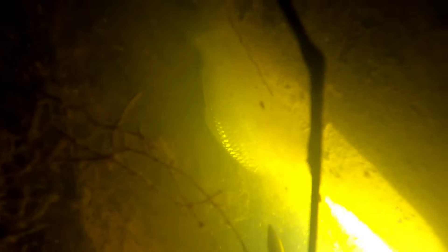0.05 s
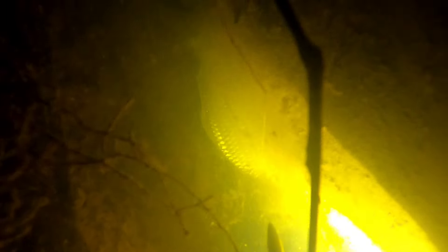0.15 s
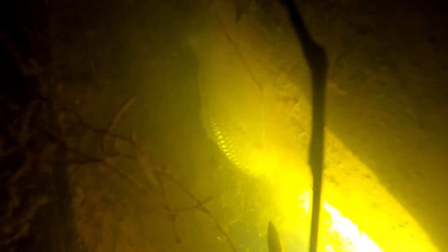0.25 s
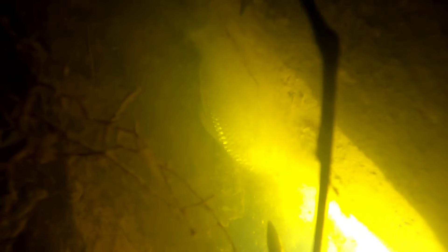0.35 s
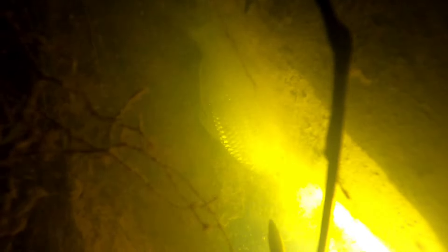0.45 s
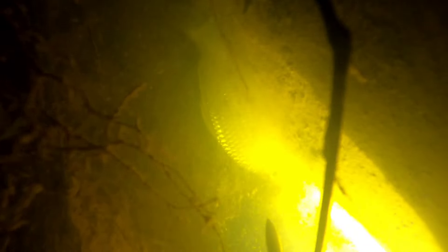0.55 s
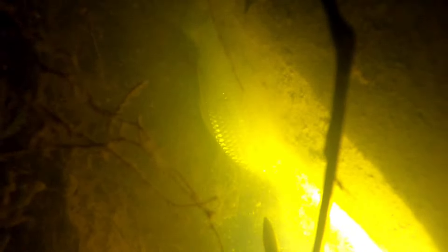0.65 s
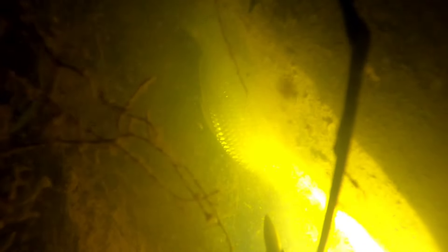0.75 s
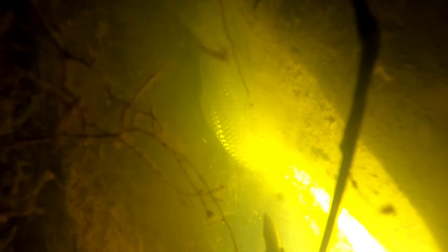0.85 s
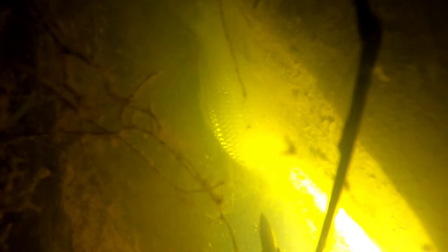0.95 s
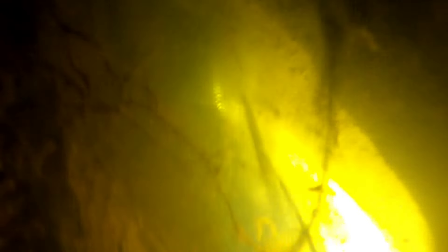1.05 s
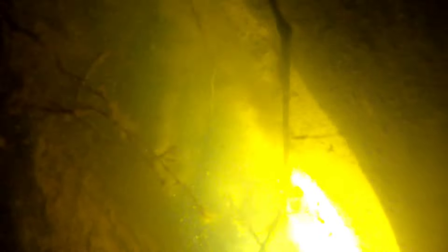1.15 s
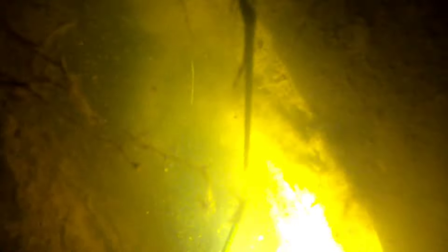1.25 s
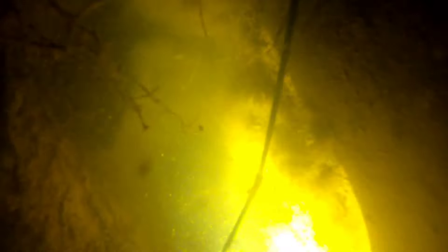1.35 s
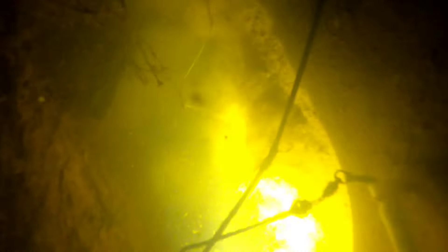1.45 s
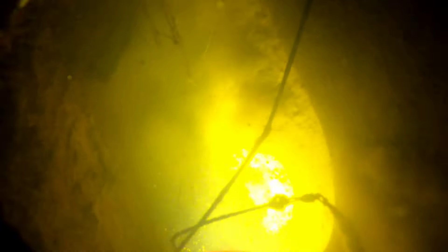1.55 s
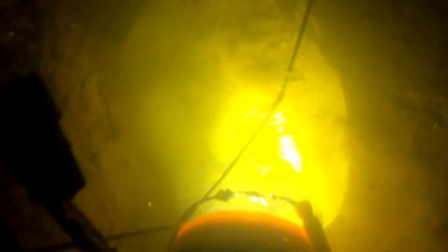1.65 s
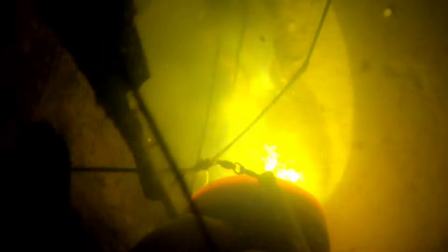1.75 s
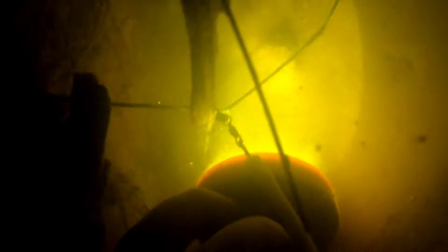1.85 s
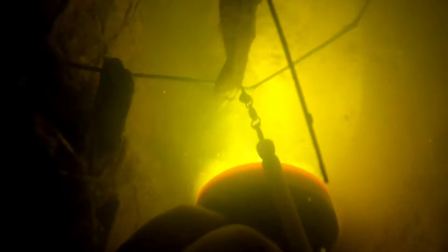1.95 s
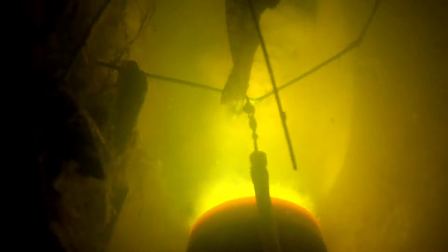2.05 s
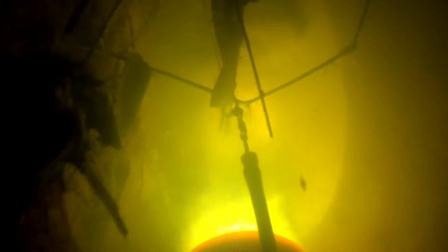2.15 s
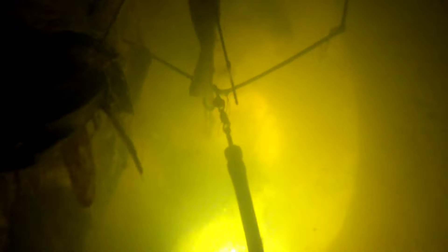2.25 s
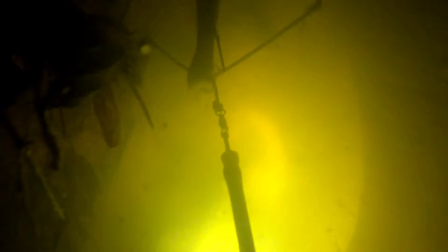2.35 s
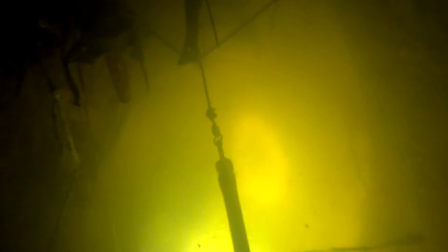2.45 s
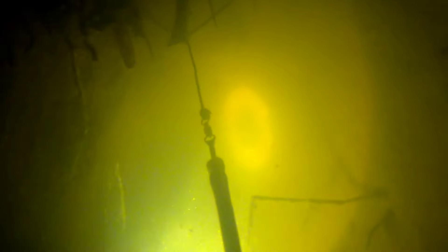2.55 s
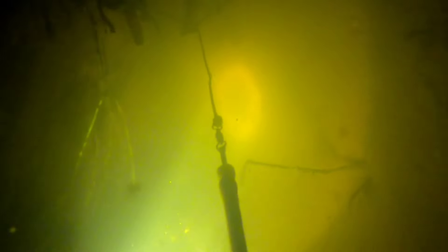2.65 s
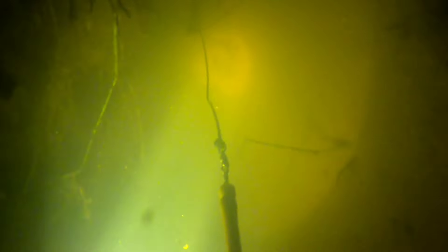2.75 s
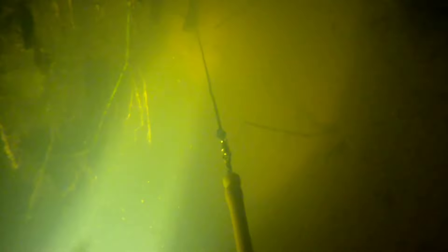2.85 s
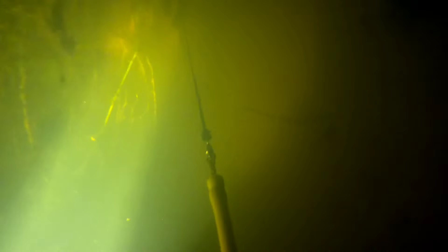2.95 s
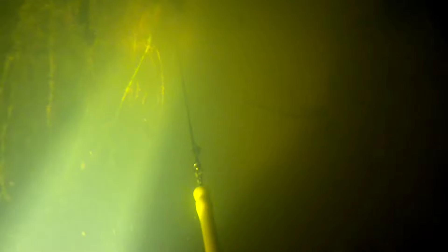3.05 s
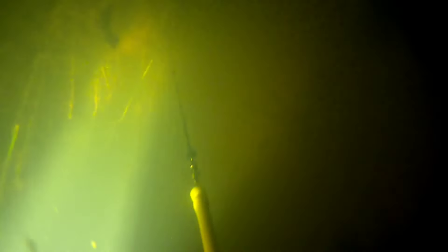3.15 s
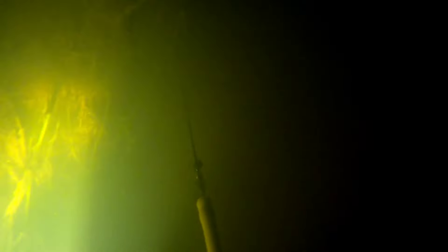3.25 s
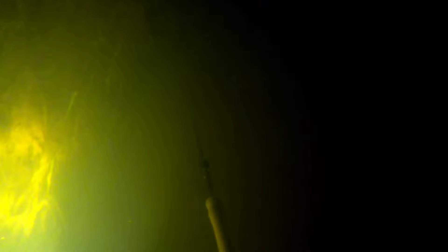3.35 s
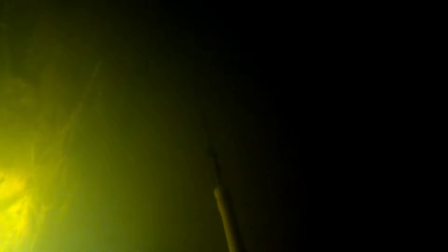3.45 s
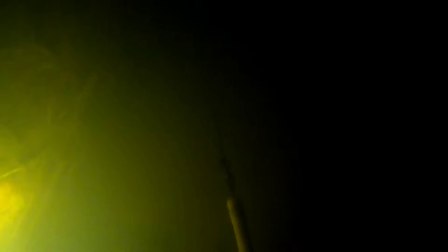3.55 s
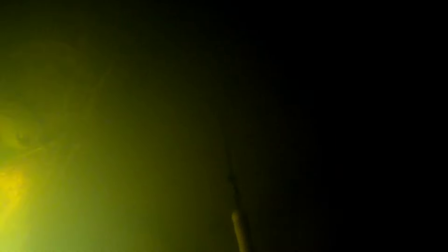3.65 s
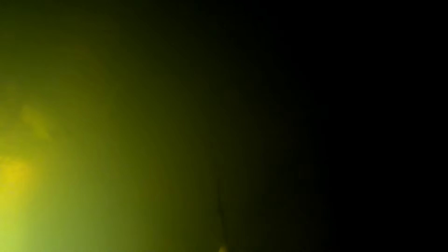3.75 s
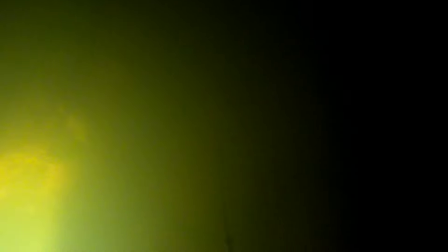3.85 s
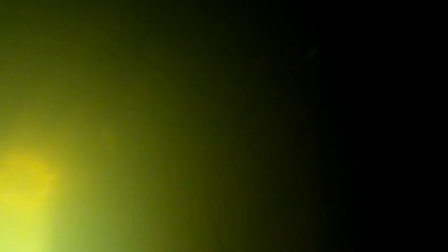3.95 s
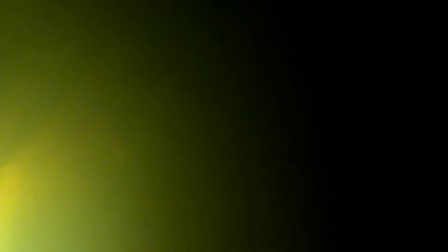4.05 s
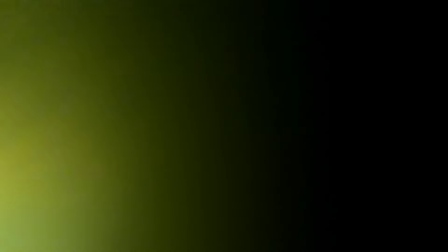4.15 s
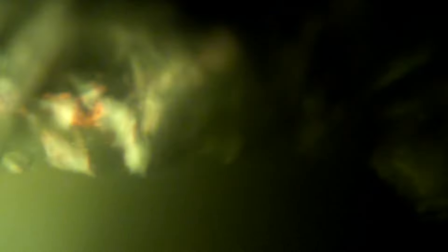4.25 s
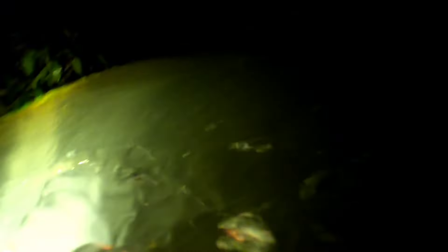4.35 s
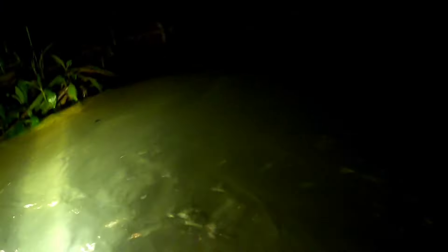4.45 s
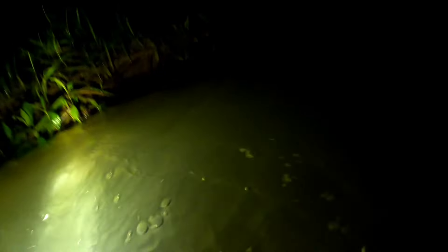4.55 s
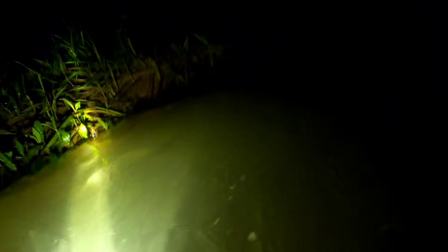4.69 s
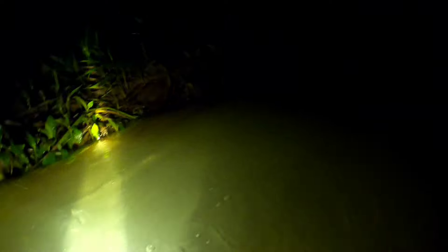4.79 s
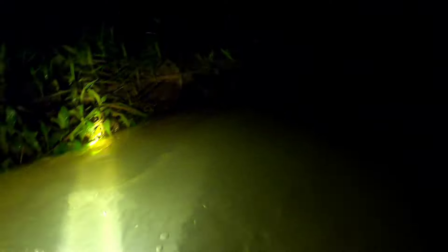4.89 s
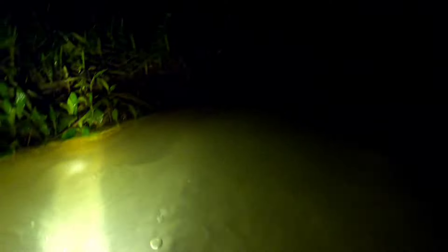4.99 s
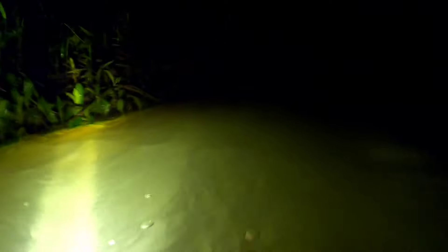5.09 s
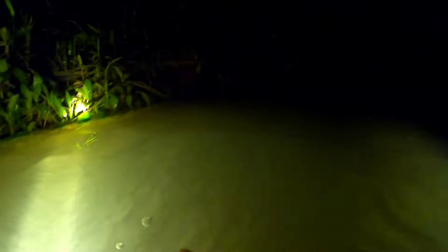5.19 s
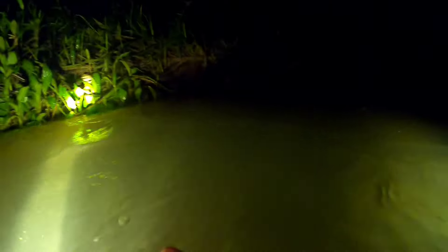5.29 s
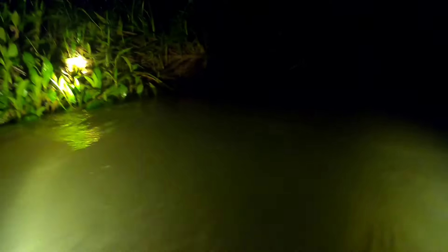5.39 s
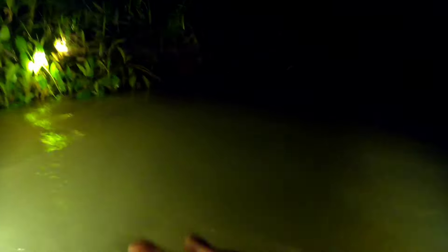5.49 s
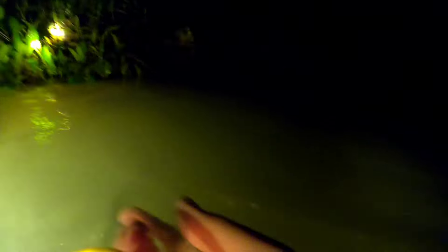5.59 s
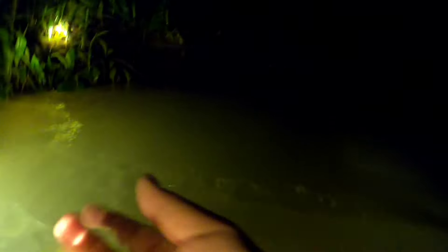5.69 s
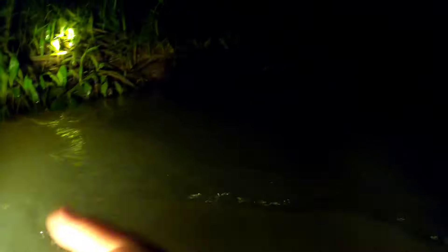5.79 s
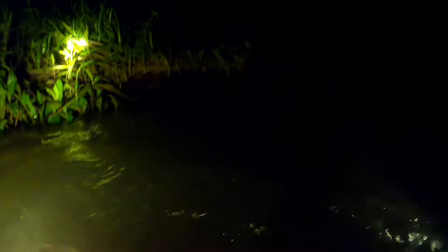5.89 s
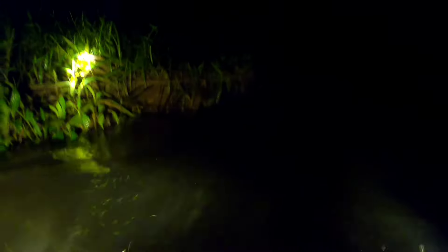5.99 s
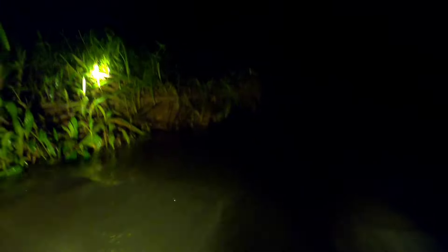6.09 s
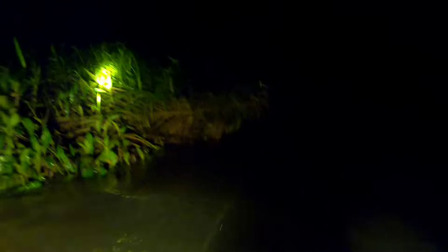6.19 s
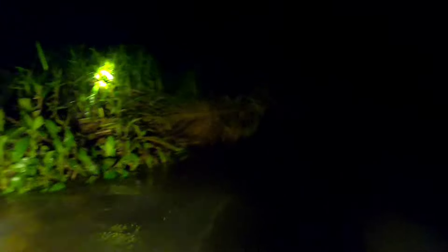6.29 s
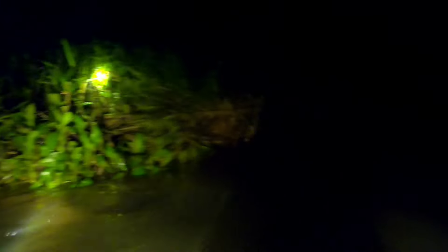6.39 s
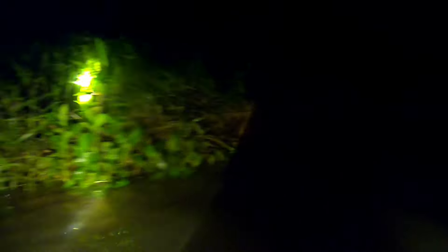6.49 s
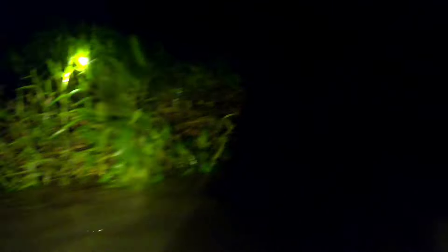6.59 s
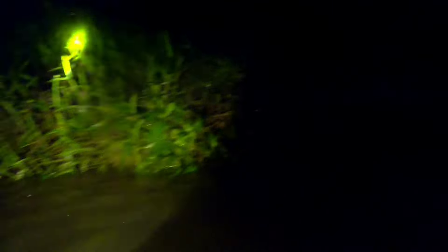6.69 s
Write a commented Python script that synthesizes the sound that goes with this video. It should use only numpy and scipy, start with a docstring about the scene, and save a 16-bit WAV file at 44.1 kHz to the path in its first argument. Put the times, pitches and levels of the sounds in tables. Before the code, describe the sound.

The sound is close and enclosed, inside a waterproof housing in a river, almost centred. From 0 to 1.3 seconds there is only dull, wavering water rumble, soft hiss and a few low bumps as the diver aims. At 1.3 a speargun fires: an abrupt, very loud cluster of hard clacks, short metallic and hollow ringing, and a deep thump swinging for a few cycles, all gone in about a tenth of a second. A burst of high fizz flares on the right and vanishes quickly, with tiny ticks after. From 1.4 the churn is stronger, muffled and gurgling. Around 3 to 4.3, small bubbles, faint prickling and low pressure bumps mark the rise, with a clear bloop near 4.2. From about 4.5 the hollow tone lifts, and brighter wash, laps, drips and small slaps continue, busiest between 4.7 and 5.4, until the end at 6.7.

```python
"""Speargun shot in a river

Underwater take from inside a waterproof camera housing, with the fizz of tiny bubbles close to its right port.
Latch, rubbers and shaft ring the modes of gun and housing over a deep recoil thump of swinging water.
Shaped noise makes the flow and the fizz; decaying tones and noise bursts make the bubbles, drips and slaps.
Water churns round the housing as the diver rises, then laps and drips on it at the surface."""
import sys
import numpy as np
from scipy import signal
from scipy.fft import rfft, irfft, next_fast_len
from scipy.io import wavfile
from scipy.ndimage import uniform_filter1d

SR = 44100
rng = np.random.default_rng(int(sys.argv[2]) if len(sys.argv) > 2 else 0)


def transcribe(u):
    """Save the signal u as a 16-bit wav file named by the first command-line argument.

    u: samples, shape (n,) or (channels, n), limited to [-1, 1]; the rate is SR.
    q: integer samples, one column per channel.
    """
    v = np.clip(np.atleast_2d(u).T, -1, 1)
    q = np.round(v * 32767).astype(np.int16)
    wavfile.write(sys.argv[1], SR, q)


N = 296761
TIME = np.arange(N) / SR
EVENT_TIME = TIME[:SR // 3]  # each short sound lasts at most a third of a second

# blows of the gun's parts: start_s, level_db, centre_hz of the excited range, crack_db relative to the blow
GUN_BLOWS = [(1.3021, -18.5, 2370, -7.5), (1.3047, -15, 1060, -22), (1.3078, -7, 3250, -21.5),
             (1.3089, -4, 230, -36), (1.313, -8, 1180, -20), (1.3149, -18, 2670, -9),
             (1.3185, -7.5, 680, -32.5), (1.32333, -17, 590, -15.5), (1.33204, -16.5, 1010, -25.5),
             (1.33505, -28.5, 1220, -16.5), (1.3444, -32.5, 1640, -15), (1.359, -39, 1400, -22.5),
             (1.374, -43, 900, -20), (1.385, -50, 1300, -20), (1.398, -42.5, 1150, -23)]
# modes of gun and housing: pitch_hz, t60_s, relative_level_db
GUN_MODES = [(177, 0.062, -6), (326, 0.064, -6), (381, .11, -7), (416, 0.14, -19), (523.5, 0.035, 5.5),
             (561, 0.12, -6), (626, 0.13, -10), (744, 0.055, -19.5), (833, 0.064, -9.5), (910, 0.05, -13),
             (968, 0.052, -15), (1104, 0.014, 8.5), (1296, 0.069, -17), (1414, 0.035, -3),
             (1533, 0.042, -3.5), (1640, .057, -18.5), (2284, 0.014, -4), (2774, 0.019, 0),
             (2916, 0.029, -8.5), (3050, 0.06, -18), (3670, .034, -22.5), (4110, .043, -23.5),
             (5800, 0.052, -30.5)]
# surges of water pressure on the housing: start_s, peak_db, pitch_hz, swell_s
PRESSURE_SURGES = [(0.062, -37.5, 75, 0.0038), (0.108, -36, 55.3, 0.0052), (0.137, -36.5, 44.7, 0.0096),
                   (0.336, -37, 168, 0.0033), (0.352, -33.5, 136, 0.004), (0.567, -35.5, 50.4, 0.0068),
                   (1.384, -35, 74.6, 0.0099), (1.423, -38, 71.6, 0.035), (2.046, -33.5, 69.6, 0.0091),
                   (2.671, -40.5, 75.4, 0.012), (3.679, -31.5, 55, 0.0093), (3.742, -35.5, 61.7, 0.011),
                   (3.945, -34, 82, 0.023), (4.251, -29.5, 46.3, 0.014), (4.262, -38, 85, 0.024),
                   (4.790, -36.5, 80, 0.01), (4.895, -38, 88.7, 0.041), (4.990, -35, 80, 0.013),
                   (5.285, -35, 94.2, 0.024), (5.309, -31, 33, 0.014)]
# bubbles and drips: start_s, peak_db, pitch_hz, swell_s
BUBBLES_AND_DRIPS = [(3.081, -46, 665, 0.0044), (3.150, -50, 670, 0.0041), (3.240, -49, 655, 0.0067),
                     (3.335, -49, 624, .005), (3.360, -52, 780, .005), (3.909, -46.5, 480, 0.011),
                     (3.925, -46, 660, 0.0063), (3.940, -43.5, 425, 0.0095), (4.172, -35, 574, 0.013),
                     (4.523, -48.5, 2180, 0.0014), (4.560, -47, 1300, 0.0034), (4.680, -48.5, 1250, .007),
                     (4.752, -45, 2700, 0.0024), (4.773, -39, 1730, 0.0026), (4.787, -43, 1330, 0.0042),
                     (4.825, -39, 1274, 0.0048), (4.838, -52, 2560, 0.0021), (5.068, -39, 1350, 0.0053),
                     (5.346, -38.5, 410, 0.0061), (5.368, -45, 342, 0.0074), (5.348, -42.5, 1400, 0.0048),
                     (5.378, -46.5, 1326, .007), (5.385, -46, 274, 0.015), (5.412, -46, 300, 0.012),
                     (5.866, -44, 1400, 0.0027), (5.972, -49, 1350, 0.0033), (5.990, -55, 2240, 0.0024)]
# slaps of water and line on the housing: start_s, level_db, centre_hz, decay_s
HOUSING_SLAPS = [(1.560, -45, 686, 0.0076), (3.578, -46, 790, .01), (3.930, -49.5, 900, .012),
                 (4.744, -45, 1400, 0.012), (4.762, -49.5, 800, 0.033), (4.819, -47.5, 2100, .015),
                 (5.243, -52, 1400, 0.015), (5.348, -44.5, 1320, 0.02), (5.812, -53.5, 1300, 0.036),
                 (5.866, -47, 990, .014), (6.151, -47, 2900, 0.0055), (6.154, -44, 495, 0.011)]
# tiny bubbles bursting against the housing, singly or in clusters: start_s, level_db, decay_s
BUBBLE_TICKS = [(1.378, -36, .0011), (1.4785, -42, .0011), (2.549, -51, .002), (3.034, -47, .0015),
                (3.133, -54, .002), (3.326, -51, .002), (3.579, -56, .006), (3.660, -54, .003),
                (3.689, -50, .0015), (4.038, -52, .011), (4.088, -62, .022), (4.264, -59, .004),
                (4.505, -58, .0015), (4.580, -57, .007)]
# trains of small bubbles and trickles: start_s, length_s, level_db, pitch_hz
BUBBLE_TRAINS = [(1.37, .16, -60, 634), (2.0, .1, -63.5, 642), (3.053, 0.31, -58.5, 676),
                 (3.55, 0.2, -63, 640), (3.827, 0.28, -59, 590), (4.204, 0.17, -60.5, 604),
                 (5.8, 0.17, -65, 1380), (6.447, 0.24, -62, 1380)]
# how hard the water moves past the housing; the diver holds still to aim, then swims: time_s, stir_db
WATER_STIR = [(0, -5), (.15, -4.5), (.3, -8.5), (.43, -3.5), (.54, -11.5), (.63, -4.5), (.78, -14),
              (.97, -12), (1.12, -7), (1.28, -6), (1.42, 1), (1.75, -0.5), (2.7, -1.64), (3.7, 1.2),
              (4.5, 0), (4.9, 1.5), (5.55, 0), (5.9, 1.5), (6.7, 1)]

# low eddies past the housing: frequency_hz, relative_density_db (per Hz)
RUMBLE_SPECTRUM = [(15, -5.5), (30, 1), (55, -1), (95, -3), (140, -8), (190, -11.5), (280, -25),
                   (500, -54.5)]
# churning water: frequency_hz, relative_density_db (per Hz)
CHURN_SPECTRUM = [(110, -21.5), (190, 0), (300, -0.5), (450, -2.5), (650, -9), (900, -13.5), (1300, -25),
                  (2500, -55)]
# higher gurgles in the churn: frequency_hz, relative_density_db (per Hz)
GURGLE_SPECTRUM = [(300, -12.5), (600, 1.5), (1100, -1.5), (1500, -8.5), (2200, -15), (4000, -22.5)]
# fine wash of water: frequency_hz, relative_density_db (per Hz)
WASH_SPECTRUM = [(500, -20.5), (900, -2.5), (1350, 1), (1900, -3.5), (2900, -4), (4000, -8), (5500, -15.5),
                 (7000, -23.5), (8200, -29.5), (12000, -33), (15500, -49.5)]
# the microphone's hiss: frequency_hz, relative_density_db (per Hz)
HISS_SPECTRUM = [(900, -13), (1350, 8.5), (1950, 5.5), (3000, 0.5), (4300, -17), (5600, -8.5),
                 (6800, -13.5), (8000, -31.5), (15000, -26)]
# bursting microbubbles: frequency_hz, relative_density_db (per Hz)
FIZZ_SPECTRUM = [(150, -28.5), (1300, -16), (2500, -25), (4400, -23.5), (8500, -26.5), (10100, -43.5),
                 (10800, -26.5), (11700, -3.5), (13200, 0.5), (15000, -6.5), (16000, -28)]
# crack of the gun's parts: frequency_hz, relative_density_db (per Hz)
CRACK_SPECTRUM = [(400, -15.5), (1000, 4.5), (1800, 10.5), (3000, 2.5), (4200, 0.5), (6000, -13.5),
                  (9000, -16.5), (10500, -33)]

# the gun fires; the housing is halfway through the surface; how long surfacing takes
SHOT_S, SURFACE_S, SURFACING_S = 1.302, 4.6, 0.44
# layers of the flow: level_db, slope (dB per dB of stir), change_at_surface_db
RUMBLE_LAW, CHURN_LAW, WASH_LAW = (-50, .6, .5), (-56.5, 1.11, 0.51), (-61, 0.7, 2.13)
# hollow note of the housing in the flow: pitch_hz, width_hz, level_db before stir
HOLLOW_SUBMERGED, HOLLOW_IN_AIR = (650, 90, -70.5), (1350, 100, -70)
TRICKLE_EDGE_S, TRICKLE_WIDTH_HZ = 0.038, 67
# the cloud of microbubbles torn open by the spear, and its lingering wake; holds count from the shot
CLOUD_DB, CLOUD_ATTACK_S, CLOUD_HOLD_S, CLOUD_RELEASE_S, CLOUD_FADE_DB_PER_S = -23.5, .004, .042, .003, 290.5
WAKE_DB, WAKE_HOLD_S, WAKE_RELEASE_S = -62, 0.15, .05
# bubbles prickle on the housing while the diver rises, over a constant floor
RISE_S, RISE_ATTACK_S, RISE_HOLD_S, RISE_RELEASE_S = 2.79, .3, 1.8, .1
RISE_DB, PRICKLE_FLOOR_DB = -79, -94.5
TOP_HZ = 15700  # upper edge of the camera's sound


def undb(db):
    """Decibels to gain."""
    return 10 ** (np.asarray(db) / 20)


def add(out, s, sound):
    """Mix a sound in at time s."""
    i = max(int(s * SR), 0)
    out[i:i + len(sound)] += sound[:N - i]


def noise():
    """White noise for the whole scene."""
    return rng.standard_normal(N)


def colour(x, spectrum):
    """Give x a spectrum of (Hz, dB) points, joined along log frequency, and a spread of 1."""
    size = next_fast_len(len(x))
    hz, db = np.transpose(spectrum)
    f = np.maximum(np.fft.rfftfreq(size, 1 / SR), 1)
    gain = undb(np.interp(np.log(f), np.log(hz), db, left=-90, right=-90))
    y = irfft(rfft(x, size) * gain, size)[:len(x)]
    return y / y.std()


def walk(rate):
    """Slow random drift with a spread of 1, drawing `rate` new values a second."""
    k = max(int(SR / rate), 1)
    steps = np.repeat(rng.standard_normal(N // k + 1), k)
    y = uniform_filter1d(uniform_filter1d(steps, k), k)[:N]
    return y / y.std()


def grains(rate, spread_db):
    """Random impulses, `rate` a second, mostly small and a few large."""
    struck = rng.random(N) < rate / SR
    size_db = spread_db * np.minimum(rng.exponential(size=N), 5)
    return struck * rng.standard_normal(N) * undb(size_db)


def resonate(x, hz, width_hz):
    """Ring one resonance with x, clear the far sides with a broader one, and set the spread to 1."""
    y = signal.lfilter(*signal.iirpeak(hz, hz / width_hz, fs=SR), x)
    y = signal.lfilter(*signal.iirpeak(hz, 2, fs=SR), y)
    return y / y.std()


def envelope(start, attack, hold, release):
    """Rises over `attack` seconds, stays until `hold` seconds after the start, then dies away."""
    age = TIME - start
    return np.clip(age / attack, 0, 1) * np.exp(-np.maximum(age - hold, 0) / release)


def burst(spectrum, decay_s, attack_s=0.0004):
    """Coloured noise that starts fast and dies away."""
    t = EVENT_TIME
    coloured = colour(rng.standard_normal(len(t)), spectrum)
    return coloured * np.exp(-t / decay_s) * (1 - np.exp(-t / attack_s)) ** 2


def pulsation(hz, swell, sharpness, glide):
    """A volume of water or air that swings up, peaks after `swell` seconds and dies, drifting in pitch."""
    age = EVENT_TIME / max(swell, 1 / SR)
    pitch_hz = hz * (1 + glide * np.tanh(age / 2 - .5))  # passes hz at the peak of the swell
    phase = np.cumsum(pitch_hz) / SR
    return (age * np.exp(1 - age)) ** sharpness * np.sin(2 * np.pi * phase)


def surfaced():
    """0 under water, 1 at the surface."""
    return np.clip(.5 + (TIME - SURFACE_S) / SURFACING_S, 0, 1)


def microphone_hiss():
    """Steady noise of the microphone."""
    return undb(-72.0) * colour(noise(), HISS_SPECTRUM)


def hollow_note(stir_db, air):
    """The flow excites a resonance of the housing, which crosses to a higher one in air."""
    out = np.zeros(N)
    for share, (hz, width, db) in ((1 - air, HOLLOW_SUBMERGED), (air, HOLLOW_IN_AIR)):
        level = undb(db + stir_db + 1.75 * walk(30))
        out += share * level * resonate(noise(), hz, width)
    return out


def flow():
    """Eddies rumble, water churns and washes past, all following the stir, and the housing sounds hollow."""
    stir_db = np.interp(TIME, *np.transpose(WATER_STIR))
    air = surfaced()
    rumble_db, churn_db, wash_db = (
        db + slope * stir_db + air_db * air for db, slope, air_db in (RUMBLE_LAW, CHURN_LAW, WASH_LAW))
    rumble = undb(rumble_db + 1.0 * walk(9)) * colour(noise(), RUMBLE_SPECTRUM)
    churn = undb(churn_db + .9 * walk(18)) * colour(grains(rate=3000, spread_db=0.5), CHURN_SPECTRUM)
    wash = undb(wash_db + 0.23 * walk(17)) * colour(noise(), WASH_SPECTRUM)
    # the churning throws off sparser, higher gurgles
    gurgle_level = undb(churn_db - 11.0 + 1.3 * walk(25))
    gurgle = gurgle_level * colour(grains(rate=900, spread_db=2.0), GURGLE_SPECTRUM)
    return rumble + churn + gurgle + wash + hollow_note(stir_db, air)


def trickles():
    """Runs of small bubbles of like size, each ringing briefly."""
    out = np.zeros(N)
    for s, length, db, hz in BUBBLE_TRAINS:
        bubbles = resonate(grains(rate=220, spread_db=.5), hz, TRICKLE_WIDTH_HZ)
        out += undb(db) * envelope(s, TRICKLE_EDGE_S, length, TRICKLE_EDGE_S) * bubbles
    return out


def sloshing():
    """Pressure surges that sink in pitch, bubbles and drips that rise in pitch, and short noisy slaps."""
    out = np.zeros(N)
    for s, db, hz, swell in PRESSURE_SURGES:
        add(out, s, undb(db) * pulsation(hz, swell, sharpness=3.8, glide=-.05))
    for s, db, hz, swell in BUBBLES_AND_DRIPS:
        add(out, s, undb(db) * pulsation(hz, swell, sharpness=1.74, glide=0.017))
    for s, db, hz, decay in HOUSING_SLAPS:
        spray = [(hz / 6, -14), (hz / 2, -5), (hz, 0), (hz * 1.33, -7), (hz * 2.1, -22), (hz * 5, -48)]
        add(out, s, undb(db) * burst(spray, decay))
    return out


def fizz():
    """Collapsing microbubbles: a dense cloud behind the spear, its wake, a faint prickle and single ticks."""
    fade_db = CLOUD_FADE_DB_PER_S * np.maximum(TIME - SHOT_S, 0)
    cloud = undb(CLOUD_DB - fade_db) * envelope(SHOT_S, CLOUD_ATTACK_S, CLOUD_HOLD_S, CLOUD_RELEASE_S)
    wake = undb(WAKE_DB) * envelope(SHOT_S, CLOUD_ATTACK_S, WAKE_HOLD_S, WAKE_RELEASE_S)
    ascent = undb(RISE_DB) * envelope(RISE_S, RISE_ATTACK_S, RISE_HOLD_S, RISE_RELEASE_S)
    strength = cloud + wake + ascent + undb(PRICKLE_FLOOR_DB)
    # the louder the fizz, the more bubbles burst each second, within limits
    rate = np.clip(1200 * (strength / undb(RISE_DB)) ** .48, 600, 30000)
    # dividing by the root of the rate leaves the loudness to the strength alone
    bursting = colour(grains(rate, spread_db=1.5) / np.sqrt(rate), FIZZ_SPECTRUM)
    out = strength * undb(1.5 * walk(12)) * bursting
    for s, db, decay in BUBBLE_TICKS:
        add(out, s, undb(db) * burst(FIZZ_SPECTRUM, decay))
    return out


def recoil():
    """The rubbers kick, the shoved water swings for a few cycles, and the shaft scrapes out of its track."""
    out, t = np.zeros(N), EVENT_TIME
    kick = pulsation(hz=119.6, swell=.0036, sharpness=0.62, glide=0)
    add(out, 1.3082, undb(-11) * kick)
    swing = np.sin(2 * np.pi * 57.5 * t) * (1 - np.exp(-t / .003))
    heave = undb(-11) * np.exp(-((t - .0248) / 0.017) ** 2)
    tail = undb(-19.5) * np.exp(-t / 0.029)
    add(out, 1.3054, swing * (heave + tail))
    scrape = burst(CRACK_SPECTRUM, decay_s=0.019)
    add(out, 1.314, undb(-39.5) * scrape)
    return out


def gun(range_octaves=0.795, crack_s=0.0017, contact_s=0.00082):
    """Each blow cracks and rings the modes near its own range; the contact time softens the ring's start."""
    out, t = np.zeros(N), EVENT_TIME
    hz, t60, db = np.transpose(GUN_MODES)
    decay_db = db[:, None] - 60 * t / t60[:, None]
    rings = np.sin(2 * np.pi * hz[:, None] * t) * undb(decay_db)
    for s, blow_db, centre_hz, crack_db in GUN_BLOWS:
        octaves_away = np.log2(hz / centre_hz)
        excited = np.exp(-.5 * (octaves_away / range_octaves) ** 2)
        ring = excited @ rings * (1 - np.exp(-t / contact_s))
        crack = burst(CRACK_SPECTRUM, crack_s)
        add(out, s, undb(blow_db) * (undb(-2.5) * ring + undb(crack_db) * crack))
    return out


def scene():
    """The housing carries everything to both channels alike; only the fizz is close to the right port."""
    body = microphone_hiss() + flow() + trickles() + sloshing() + recoil() + gun()
    left_fizz, right_fizz = undb(-40) * fizz(), fizz()  # the left side gets a much fainter, independent fizz
    return body + np.array([left_fizz, right_fizz])


def record(dry):
    """The camera rounds the very highest peaks and cuts the top of the treble."""
    rounded = dry / (1 + (dry / .92) ** 12) ** (1 / 12)
    top_cut = signal.ellip(8, .2, 70, TOP_HZ, fs=SR, output="sos")
    return signal.sosfilt(top_cut, rounded)


dry = scene()
out = record(dry)
transcribe(out)
```